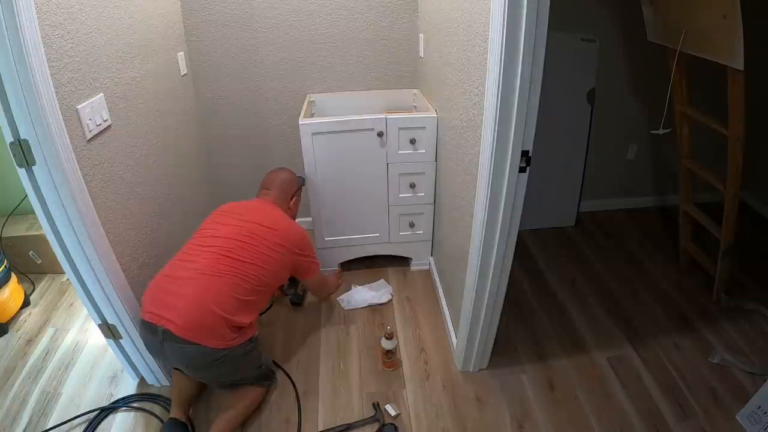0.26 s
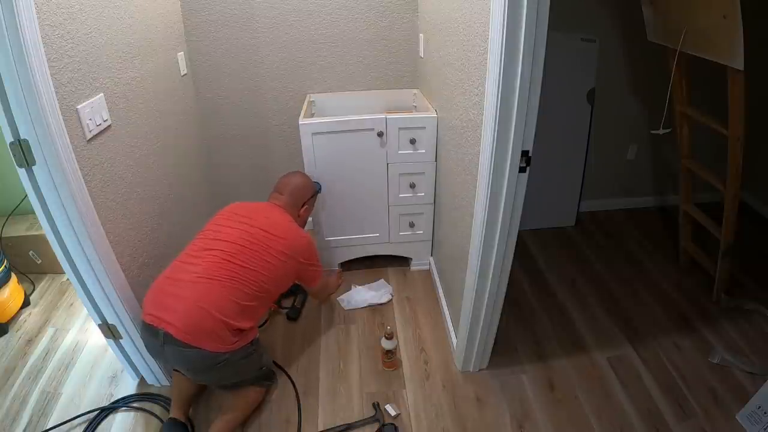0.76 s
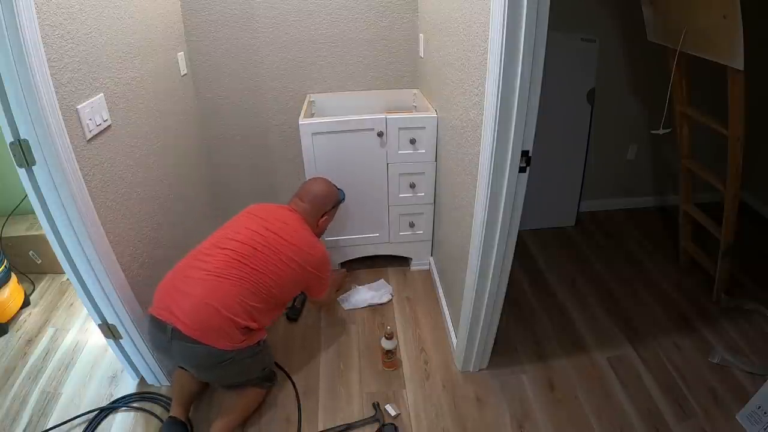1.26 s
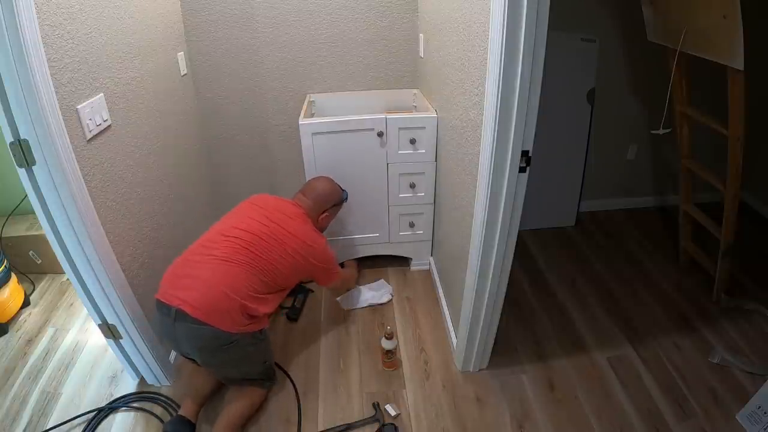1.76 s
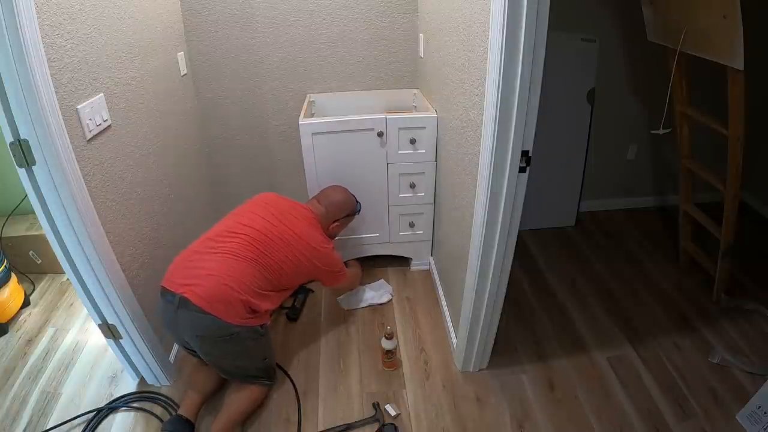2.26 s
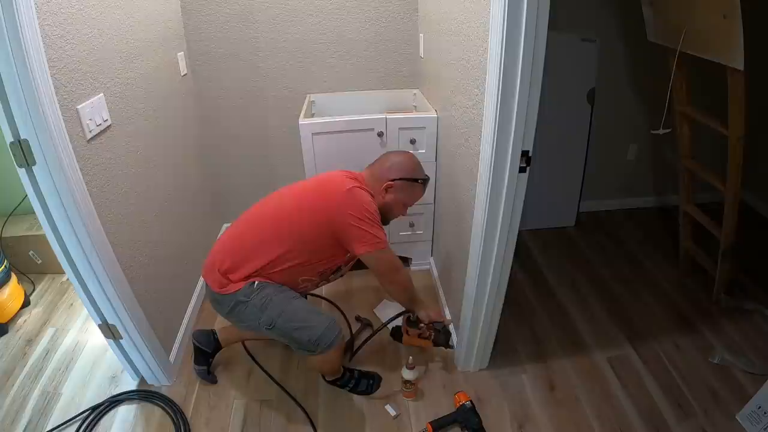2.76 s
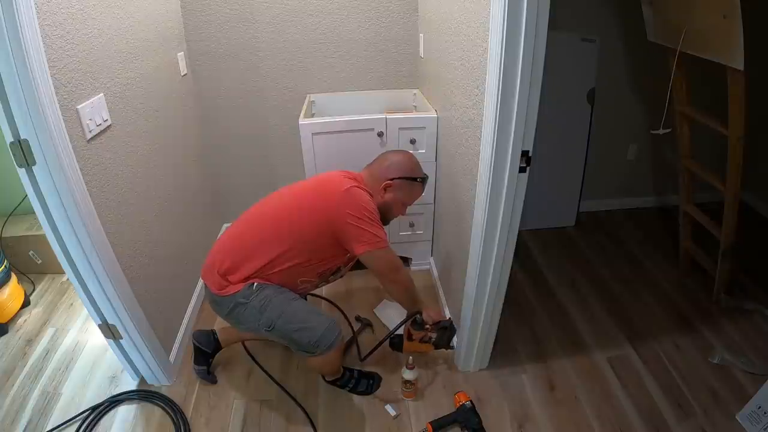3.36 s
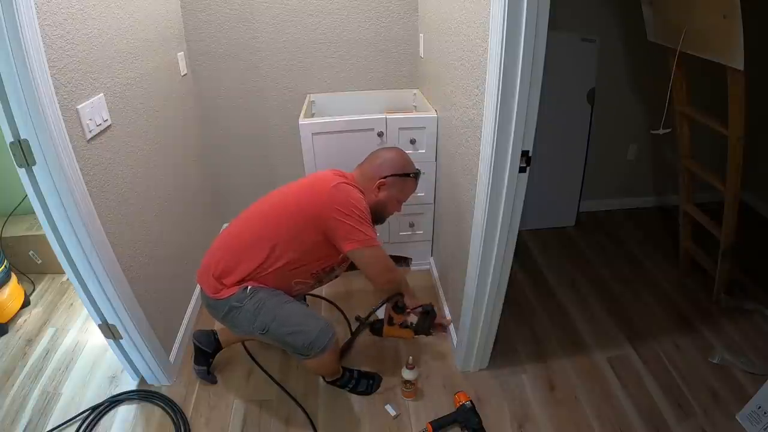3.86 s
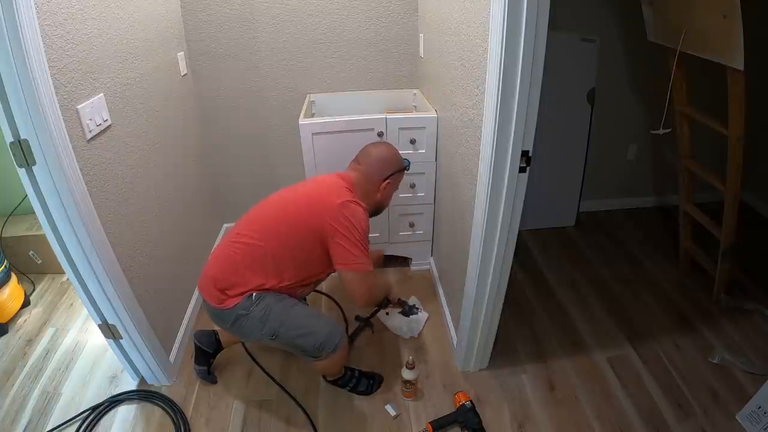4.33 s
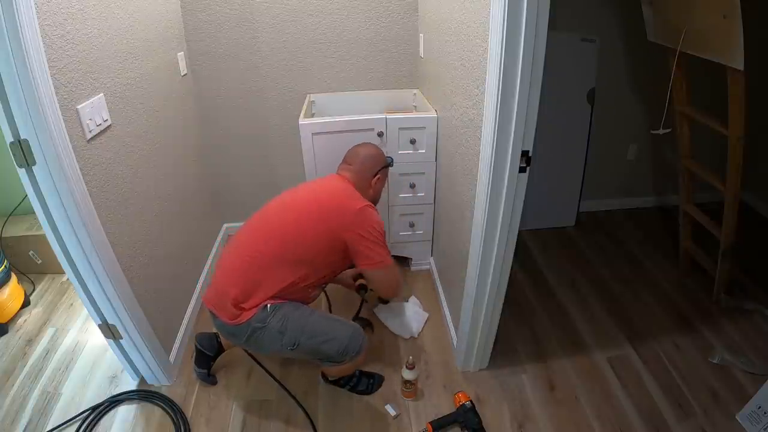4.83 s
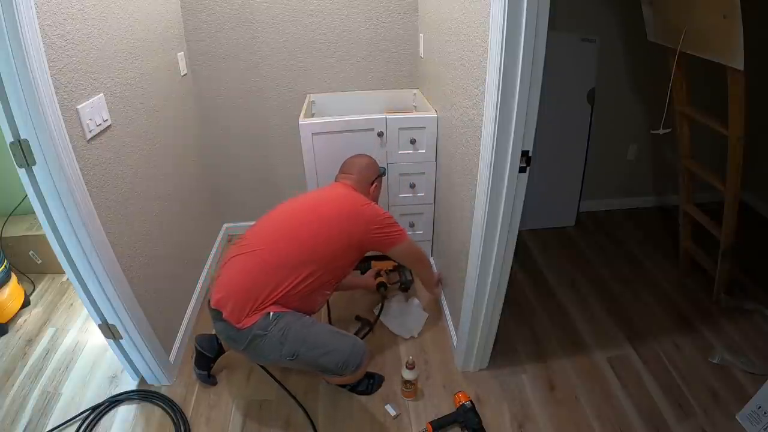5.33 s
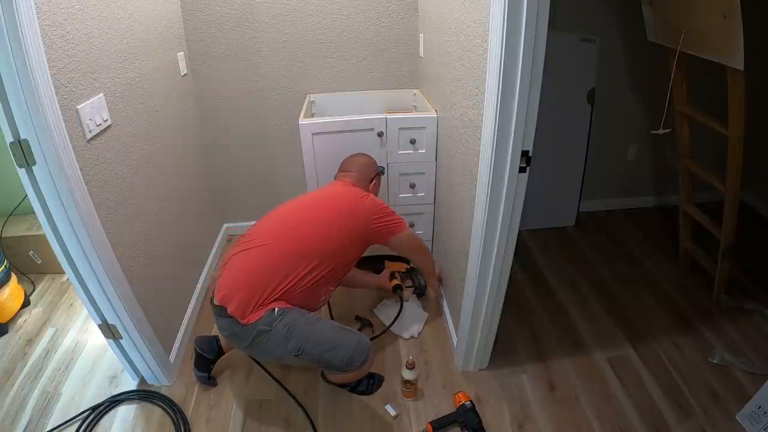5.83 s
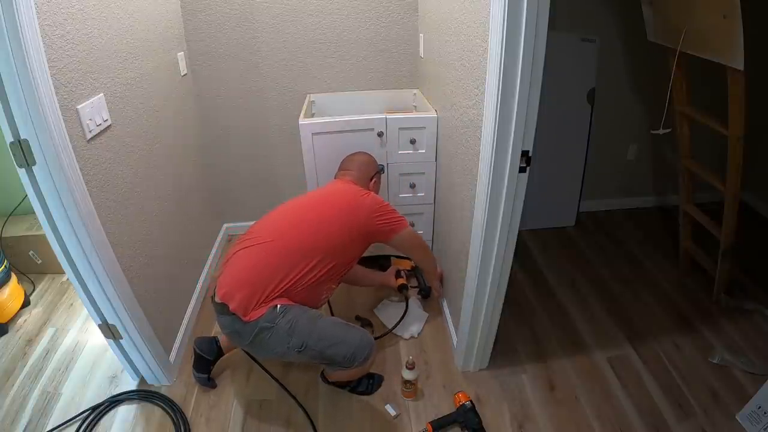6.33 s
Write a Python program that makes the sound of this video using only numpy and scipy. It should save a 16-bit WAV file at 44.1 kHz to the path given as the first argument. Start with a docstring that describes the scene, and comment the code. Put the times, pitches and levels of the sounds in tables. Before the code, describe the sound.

A small, bare, hard-walled room with echoing empty spaces beyond, heard from a few metres away over a very faint hush with a low drone. At 0 s the reverberant tail of a nailer shot is dying away. From 0.36 to 0.47 s sharp wooden clacks come in a quick cluster, more at about 0.6 s, with a fading rattle until 0.7 s. From 0.8 to 2.5 s there is soft scuffing, hose rubbing with thin wavering whistles, small ticks near 1.3 s and low bumps around 1.6-1.7 and 2.25 s. It is nearly still until 3.53 s, when the gun fires: trigger click, piston crack, steel ring, wall boom, then a short air puff about a tenth of a second later. The echo rings on. Shuffling and hose squeaks return from 4 s, strongest near 4.8 s, with a small clack at 4.9 s, soft bumps near 5.25 s, a duller knock at 6.4 s and a last rub to the end.

```python
"""A pneumatic nailer fixes trim at the foot of a cabinet in a small bare room that opens on empty, echoing rooms.
First one shot dies away; then wood clacks and rattles on the floor (struck noise and decaying modes).
Next the kneeling worker shifts about: pitched bumps, light ticks, friction noise, whistles of the hose.
A second shot follows: trigger, piston, nail and ringing-on (noise bursts, steel, wall boom), exhaust puff (noise).
The shifting resumes, with a few more clacks, to the end; a hush with a low drone lies under it all."""
import sys
import numpy as np
from scipy import signal
from scipy.fft import rfft, irfft, next_fast_len
from scipy.io import wavfile
from scipy.ndimage import uniform_filter1d

SR = 44100
rng = np.random.default_rng(int(sys.argv[2]) if len(sys.argv) > 2 else 0)


def to_wav(s):
    """Save 16-bit WAV."""
    ch = np.atleast_2d(s).T  # columns
    pcm = np.round(np.clip(ch, -1, 1) * 32767)  # PCM
    wavfile.write(sys.argv[1], SR, pcm.astype(np.int16))


N = 290619
TIME_S = np.arange(N) / SR
HIT_TIME_S = np.arange(2 ** 14) / SR
LEAD_S = 0.4   # the nailer track starts this early

# shots: fire_s, level_db, extra_boom_db, exposed (share of the gun's ring not muffled by the worker)
SHOTS = [(-0.2, -6.5, 5.5, 0.26), (3.531, 0, -3, 0.94)]
# blows and ringing-on within a shot: after_firing_s, level_db, t60_s, tilt_db_per_octave, thump_db
BLOWS_AND_TAILS = [(-0.043, -31.5, .02, 0.34, -46.5), (-0.028, -48.5, 0.037, 2.5, -50.5),
                   (-0.005, -30, .1, 6, -43.5), (0.0, -16, 0.038, 2, -11.5),
                   (0.0236, -14.5, 0.088, 0, -24.5), (0.0268, -23, 0.11, 0, -14.5),
                   (0.04, -22.5, 0.48, -2, -38), (0.089, -26.5, 0.017, -0.5, -45),
                   (0.113, -29, 0.05, 1, -21), (0.14, -31.5, 0.41, -1, -33.5)]
# colour of gun and trim under the driver: freq_hz, gain_db
GUN_COLOUR = [(59, -48), (100, -2), (156, -3.5), (219, -3), (254, -10.5), (289, -6), (568, -5),
              (1330, -15.5), (1640, -11.5), (2250, -11), (5150, -15), (6500, -14.5), (15800, -27)]
# their resonances, lift before muffling: freq_hz, width_hz, lift_db
GUN_PEAKS = [(326, 65, 4), (493, 38, -2.5), (582, 78, 6), (930, 64, 4), (1350, 100, -3), (1706, 100, 6.5),
             (2200, 95, 6.5), (3560, 96, 8), (4800, 120, 4), (5600, 78, 6), (6400, 150, 7), (9140, 310, 8),
             (10200, 250, 8), (11000, 410, -5.5)]
# steel of the gun, level against the blow or tail, before muffling: freq_hz, level_db, t60_s
STEEL_MODES = [(1704, -20, 0.21), (2203, -18, .17), (3846, -23, .2), (3882, -21, .2), (4678, -21, 0.15),
               (6982, -23, 0.15), (9103, -23, .12)]
# boom of wall and cabinet, level against the thump: freq_hz, level_db, t60_s
BOOM_MODES = [(70.6, -14.5, 0.18), (147, -2.5, 0.16), (181, 1, 0.075), (217, -8, 0.16),
              (294.3, -19.5, 0.27)]
# colour of the exhaust air: freq_hz, gain_db
AIR_COLOUR = [(300, -22.5), (1200, -2), (2800, -10), (4200, -0.5), (7000, -3), (10000, -6.5),
              (12000, -10.5), (16000, -18.5)]
# resonances of the exhaust port, lift before muffling: freq_hz, width_hz, lift_db
PORT_PEAKS = [(1324.5, 350, -6.5), (2300, 20, 11.5), (3930, 190, 10.5), (4800, 110, 3), (5600, 240, -3.5),
              (7200, 55, 2.5), (8300, 58, 3), (10200, 110, 3.5)]
# exhaust puff: opening after firing, swell, hold before the valve closes; level against the shot
PUFF_S, PUFF_ATTACK_S, PUFF_HOLD_S = 0.108, 0.004, 0.055
PUFF_DB, PUFF_SAG_DB_PER_S, PUFF_RELEASE_T60_S = -18.5, 164.5, 0.14
# kick as the piston returns: time after firing, level against shot and boom
RECOIL_S, RECOIL_HZ, RECOIL_DB, RECOIL_T60_S = 0.111, 84.8, -23.5, 0.3

# wooden clacks: start_s, level_db, t60_s, tilt_db_per_octave
CLACKS = [(0.355, -17, 0.07, 2), (0.3625, -17, 0.025, 1), (0.408, -22, 0.043, 1.5), (0.416, -32, 0.026, -2),
          (0.4435, -25, 0.057, -0.5), (0.465, -32.5, 0.052, 0), (0.5986, -32.5, 0.088, -1.5),
          (0.6135, -25, 0.062, -.5), (0.667, -42, 0.31, -1), (0.7169, -42, 0.16, -2.5),
          (0.7797, -40.5, 0.035, -2.5), (1.0744, -51.5, 0.05, -5), (1.2532, -58, 0.094, -12),
          (2.245, -56, 0.036, -3), (4.9133, -47.5, 0.16, 1), (5.952, -51, 0.022, -8.5),
          (6.384, -33, 0.058, -6), (6.42, -52.5, 0.21, -6), (6.572, -57, .1, -7)]
# colour of the trim: freq_hz, gain_db
WOOD_COLOUR = [(60, -24.5), (200, -17), (450, -8), (700, -2.5), (900, -0.5), (1400, -6), (2200, -9.5),
               (4000, -13), (7500, -21), (11000, -32), (16000, -44)]
# resonances of the trim: freq_hz, width_hz, lift_db
WOOD_PEAKS = [(516, 35, 7.5), (807, 50, 7.5), (895, 160, 0), (964, 260, 7), (1300, 170, -6),
              (1633, 54, 6.5), (1880, 110, 6), (1900, 53, -5), (2090, 120, 4), (3000, 140, 1),
              (4120, 72, 1.5)]
# ringing modes of the trim, level against the contact: freq_hz, level_db, t60_s
WOOD_MODES = [(556, -12, 0.086), (830, -5.5, 0.044), (860, -9.5, 0.039), (1050, -16.5, 0.029)]
# rattle of the settling wood: start_s, end_s
RATTLE_SPAN_S = (0.53, .7)
RATTLE_PER_S, RATTLE_DB, RATTLE_FADE_DB_PER_S, RATTLE_SCATTER_DB = 45, -43.5, 28, 3
RATTLE_T60_S, RATTLE_TILT_DB_PER_OCTAVE = 0.056, -2.5
# light ticks of tool and hose: start_s, level_db, tilt_db_per_octave
TICKS = [(1.3004, -49.5, 2), (1.383, -51, 2), (1.891, -69, 6), (2.244, -68, 5), (2.427, -68.5, 8.5),
         (2.853, -72, -3.5), (3.025, -74, -11.5), (3.149, -69.5, -4), (3.218, -69.5, -4),
         (3.3751, -64.5, -7.5), (5.267, -66, 2), (5.424, -70, 5)]
# colour of a tick: freq_hz, gain_db
TICK_COLOUR = [(300, -3.5), (1000, 3.5), (3000, 6.5), (6500, 4), (10000, -3.5), (16000, -18)]
TICK_T60_S = 0.045
# knees and feet on the floor, before thud and panel offsets: start_s, level_db, pitch_hz, t60_s
BUMPS = [(1.62, -39.5, 142.3, 0.41), (1.711, -38, 167, 0.052), (1.952, -55, 145, 0.42),
         (2.06, -53.5, 148, 0.26), (2.14, -54, 145, 0.54), (2.251, -42, 140.4, 0.15),
         (4.095, -56, 181, 0.19), (5.251, -52, 210.6, 0.46), (5.27, -48, 189.6, 0.23),
         (5.954, -49, 177, 0.097), (6.383, -55.5, 164.3, 0.47)]
# colour of floor boards under a soft contact: freq_hz, gain_db
BOARD_COLOUR = [(30, -30), (60, -8), (130, -2), (220, -5), (300, 1), (470, 4.5), (700, -7), (1500, -34),
                (8000, -35.5)]

# shifts of the worker, shoes, hose and cloth at once: start_s, length_s, scuff_db, rub_db, swish_db
MOVES = [(0.784, 0.25, -64, -64, -69.5), (1.095, 0.43, -62, -60.5, -67), (1.495, .36, -63, -52.5, -64.5),
         (1.904, 0.34, -73.5, -64.5, -75.5), (2.169, 0.42, -78.5, -68, -80.5),
         (2.533, 0.32, -82, -73, -86.5), (3.936, 0.67, -63, -58, -67.5), (4.525, 0.5, -57.5, -61.5, -64.5),
         (4.759, 0.26, -54.5, -58, -68), (4.88, 0.36, -63.5, -56.5, -70.5), (5.19, 0.4, -72, -71, -82.5),
         (5.55, .2, -75.5, -77, -83), (5.7, 0.36, -81, -72, -86), (6.001, 0.12, -67, -64, -72),
         (6.43, 0.38, -64.5, -70, -90)]
# colour of the shoes' scuff: freq_hz, gain_db
SCUFF_COLOUR = [(200, -31.5), (550, 2.5), (1000, 0), (1600, -5.5), (2600, -5.5), (6000, -37.5)]
# colour of the hose's rub: freq_hz, gain_db
RUB_COLOUR = [(800, -13), (1700, -14), (2500, -2.5), (4700, 2.5), (7000, -7), (9000, -25), (16000, -40.5)]
# resonances of the rubbing hose: freq_hz, width_hz, lift_db
RUB_PEAKS = [(2282, 152, 6), (2687, 330, 0), (3123, 144, 6), (3670, 154, 2.5), (4270, 200, 0.5),
             (4725, 125, 3.5)]
# colour of the cloth's swish: freq_hz, gain_db
SWISH_COLOUR = [(3000, -60), (6500, -6.5), (8500, -7.5), (11000, -14), (14000, -17.5), (16000, -44.5)]
FRICTION_POWER = 0.88   # exponent of friction amplitude on speed
LINGER_DB, LINGER_T60_S = -6.5, 0.83
# hose pulled over an edge, one list per pull, ribs passing a second: time_s, rib_rate_hz
PULLS = [
    [(1.12, 1230), (1.18, 1500), (1.26, 1735), (1.33, 1530), (1.39, 1590), (1.47, 1460), (1.58, 1700),
     (1.7, 2070), (1.84, 1340)],
    [(4.94, 1800), (5.02, 1690), (5.08, 1720), (5.16, 1670), (5.22, 1360)],
    [(5.35, 1290), (5.42, 1460), (5.49, 1340)],
    [(6.47, 1230), (6.53, 1480), (6.6, 1600)],
]
# whistles on overtones of the rib rate, level at the usual rub: multiple, level_db
WHISTLES = [(5, -85), (6, -78), (7, -82), (8, -82), (9, -91)]
WHISTLE_FOLLOWS, USUAL_RUB_DB = 0.45, -60   # share of the rub's swing in dB about its usual level
WAVER_HZ, GRIP_DB, JITTER_RAD = 20, 4.2, 0.9   # unsteadiness of rib rate, level, phase

# reverberation: freq_hz, near_db, near_t60_s, far_db, far_t60_s
ROOMS = [(60, -10, 0.65, -24.5, 0.38), (208, -14, 0.22, -37, 0.23), (550, -12.5, 0.89, -13.5, 1.2),
         (1010, -14.5, 0.13, -8, 0.65), (2200, -7, 0.25, -16.5, 2.1), (4500, -9, 0.5, -11, 1.8),
         (7860, -7, .33, -12, .95), (15000, -18.5, .27, -22, 0.5)]
# colour of the room tone: freq_hz, gain_db
HUSH_COLOUR = [(25, -18), (42, -15.5), (55, -1.5), (80, 3), (110, -4.5), (165, -1), (240, -7.5), (370, -4),
               (600, -11.5), (1000, -19.5), (1400, -26.5), (4500, -29.5), (8000, -33), (16000, -39.5)]
# low drone in the room tone: freq_hz, width_hz, lift_db
HUSH_PEAKS = [(157, 5.2, 7.5)]
HUSH_DB = -68
STOPBAND_HZ = 16500


def nailer():
    """Trigger, piston and driver strike and ring on, the wall booms; then the air vents and the gun kicks back."""
    out = np.zeros(N + round(LEAD_S * SR))
    boom = sum(ring(*mode) * (-1) ** k for k, mode in enumerate(BOOM_MODES))
    steel = sum(ring(*mode) for mode in STEEL_MODES)
    venting = exhaust_envelope()
    for fire_s, shot_db, boom_db, exposed in SHOTS:
        start_s = fire_s + LEAD_S
        shot_gain = from_db(shot_db)
        gun_peaks = np.array(GUN_PEAKS) * [1, 1, exposed]
        port_peaks = np.array(PORT_PEAKS) * [1, 1, exposed]
        for after_s, level_db, t60_s, tilt_db, thump_db in BLOWS_AND_TAILS:
            burst = strike(GUN_COLOUR, gun_peaks, level_db, t60_s, tilt_db)
            ringing = exposed * from_db(level_db) * steel
            thump = from_db(thump_db + boom_db) * boom
            add(out, start_s + after_s, shot_gain * (burst + ringing + thump))
        air = rms_one(colour(rng.standard_normal(len(HIT_TIME_S)), AIR_COLOUR, port_peaks))
        add(out, start_s, shot_gain * venting * air)
        recoil = ring(RECOIL_HZ, RECOIL_DB + shot_db + boom_db, RECOIL_T60_S)
        add(out, start_s + RECOIL_S, recoil)
    return out


def exhaust_envelope():
    """The valve opens quickly, the pressure sags as the cylinder empties, then the valve closes."""
    t = np.maximum(HIT_TIME_S - PUFF_S, 0)
    opening = np.minimum(t / PUFF_ATTACK_S, 1)
    pressure = from_db(PUFF_DB - PUFF_SAG_DB_PER_S * t)
    closing = dying(np.maximum(t - PUFF_HOLD_S, 0), PUFF_RELEASE_T60_S)
    return opening * pressure * closing


def handling():
    """Contacts excite their bodies: wood clacks, tool and hose tick, knees and feet bump the boards."""
    out = np.zeros(N)
    trim = sum(ring(*mode) * (-1) ** k for k, mode in enumerate(WOOD_MODES))
    for start_s, level_db, t60_s, tilt_db in list(CLACKS) + rattle():
        clack = strike(WOOD_COLOUR, WOOD_PEAKS, level_db, t60_s, tilt_db)
        # a dull contact puts more of its force into the low modes
        modes = from_db(level_db - 0.91 * tilt_db - 2) * trim
        add(out, start_s, clack + modes)
    for start_s, level_db, tilt_db in TICKS:
        add(out, start_s, strike(TICK_COLOUR, (), level_db, TICK_T60_S, tilt_db))
    for start_s, level_db, pitch_hz, t60_s in BUMPS:
        thud = strike(BOARD_COLOUR, (), level_db - 8.5, t60_s, tilt_db=-0.5)
        swell = 1 - np.exp(-HIT_TIME_S / 0.0078)
        panel = ring(pitch_hz, level_db + 2, 0.82 * t60_s) * swell
        add(out, start_s, thud + panel)
    return out


def rattle():
    """Small uneven touches that fade as the wood settles, as further rows of clacks."""
    start_s, end_s = RATTLE_SPAN_S
    chance = rng.standard_normal((40, 2))
    after_s = (np.arange(len(chance)) + 0.3 * chance[:, 0]) / RATTLE_PER_S
    levels_db = RATTLE_DB - RATTLE_FADE_DB_PER_S * after_s + RATTLE_SCATTER_DB * chance[:, 1]
    return [(start_s + s, level_db, RATTLE_T60_S, RATTLE_TILT_DB_PER_OCTAVE)
            for s, level_db in zip(after_s, levels_db) if start_s + s < end_s]


def sliding():
    """Shoes, hose and cloth drag with friction noise, uneven for shoes and hose; the hose whistles as it rubs."""
    scuff, rub, swish = friction()
    scuffing = scuff * noise(SCUFF_COLOUR) * from_db(2.1 * wander(90))
    rubbing = rub * noise(RUB_COLOUR, RUB_PEAKS) * from_db(-3.64 + wander(120))
    swishing = swish * noise(SWISH_COLOUR)
    whistle_gain = (rub / from_db(USUAL_RUB_DB)) ** WHISTLE_FOLLOWS
    return scuffing + rubbing + swishing + whistle_gain * hose_whistles()


def friction():
    """Amplitudes of scuff, rub and swish follow the half-sine speed of each move and linger in the room."""
    power = np.zeros((3, N))
    for start_s, length_s, *levels_db in MOVES:
        speed = np.sin(np.pi * np.clip((TIME_S - start_s) / length_s, 0, 1))
        power += np.outer(from_db(levels_db), speed ** FRICTION_POWER) ** 2
    kept = dying(1 / SR, LINGER_T60_S) ** 2
    lingering = from_db(LINGER_DB) ** 2 * signal.lfilter([1 - kept], [1, -kept], power + 1e-18)
    return np.sqrt(power + lingering)


def hose_whistles():
    """The ribbed hose sings near overtones of its rib rate, higher as it slides faster; each whistle wavers."""
    out = np.zeros(N)
    for pull in PULLS:
        times_s, rates_hz = np.transpose(pull)
        during = (TIME_S > times_s[0]) & (TIME_S < times_s[-1])
        rib_hz = uniform_filter1d(np.interp(TIME_S[during], times_s, rates_hz), size=1500)
        swell = signal.windows.tukey(len(rib_hz), 0.15)
        for multiple, level_db in WHISTLES:
            waver, grip, jitter = [wander(rate)[during] for rate in (40, 22, 600)]
            phase = 2 * np.pi * np.cumsum(multiple * (rib_hz + WAVER_HZ * waver)) / SR
            gain = swell * from_db(level_db + GRIP_DB * grip)
            out[during] += gain * np.sin(phase + JITTER_RAD * jitter)
    return out


def rooms(x):
    """Noise decaying band by band: the small room answers first, the empty rooms swell later and ring on."""
    t = np.arange(int(1.5 * SR)) / SR
    edges_hz = np.geomspace(40, 17000, 16)
    white, response = rng.standard_normal((2, len(t))), 0
    onset = np.clip((t - 0.004) / 0.0067, 0, 1)
    far_onset = onset * (1 - np.exp(-t / 0.013))
    table = np.array(ROOMS)
    for k, (low, high) in enumerate(zip(edges_hz, edges_hz[1:])):
        bandpass = signal.butter(2, [low, high], "band", fs=SR, output="sos")
        band = signal.sosfilt(bandpass, white[k % 2])
        centre_hz = np.sqrt(low * high)
        near_db, near_t60_s, far_db, far_t60_s = [at_hz(table[:, [0, c]], centre_hz) for c in range(1, 5)]
        near = from_db(near_db) * rms_one(onset * dying(t, near_t60_s))
        far = from_db(far_db) * rms_one(far_onset * dying(t, far_t60_s))
        response = response + band * np.hypot(near, far) / np.sqrt(len(t))
    return signal.fftconvolve(x, response)[:len(x)]


def room_tone():
    """Steady coloured noise with a narrow resonance heard as a low drone."""
    return from_db(HUSH_DB) * noise(HUSH_COLOUR, HUSH_PEAKS)


def strike(spectrum, peaks, level_db, t60_s, tilt_db):
    """A contact scatters into a quick broadband flurry off floor and walls, coloured by the struck body."""
    attack = 1 - np.exp(-HIT_TIME_S / 0.0009)
    flurry = rng.standard_normal(len(HIT_TIME_S)) * dying(HIT_TIME_S, t60_s) * attack
    power = uniform_filter1d(abs(rfft(flurry)) ** 2, size=70)
    flat = causal_filter(flurry, -10 * np.log10(power + 1e-12))
    sound = colour(flat, spectrum, peaks, tilt_db)
    # the level is that of the first moments of the decay
    span_s = 0.003 + abs(t60_s) / np.log(1e6)
    return from_db(level_db) * sound / np.sqrt(np.sum(sound ** 2) / (SR * span_s))


def ring(hz, level_db, t60_s):
    """One struck mode: a sine that decays exponentially."""
    return from_db(level_db) * np.sin(2 * np.pi * hz * HIT_TIME_S) * dying(HIT_TIME_S, t60_s)


def noise(spectrum, peaks=()):
    """Steady coloured noise of rms 1."""
    return rms_one(colour(rng.standard_normal(N), spectrum, peaks))


def wander(rate_hz):
    """Random values, rate_hz new ones a second, joined by straight lines; spread somewhat under 1."""
    knots = rng.standard_normal(N // 40)
    return np.interp(TIME_S * rate_hz, np.arange(len(knots)), knots)


def colour(x, spectrum, peaks=(), tilt_db=0):
    """Pass x through a body: a smooth spectrum, resonances, and a tilt per octave that is level below 700 Hz."""
    hz = np.fft.rfftfreq(2 * next_fast_len(len(x) // 2 + 1, True), 1 / SR)
    gain_db = at_hz(spectrum, hz) + tilt_db * np.log2(np.maximum(hz, 700) / 1000)
    for centre_hz, width_hz, lift_db in peaks:
        gain_db = gain_db + lift_db / (1 + (2 * (hz - centre_hz) / width_hz) ** 2)
    return causal_filter(x, gain_db)


def causal_filter(x, gain_db):
    """Minimum-phase filter with one gain per frequency bin: nothing rings early."""
    cepstrum = irfft(np.log(from_db(gain_db)))
    half = len(cepstrum) // 2
    cepstrum[1:half] *= 2
    cepstrum[half + 1:] = 0
    response = np.exp(rfft(cepstrum))
    return irfft(rfft(x, len(cepstrum)) * response)[:len(x)]


def from_db(db):
    """Decibels to gain."""
    return 10 ** (np.asarray(db) / 20)


def rms_one(x):
    """Scale to an rms of 1."""
    return x / np.sqrt(np.mean(x ** 2) + 1e-20)


def at_hz(points, hz):
    """Read (freq_hz, value) rows on a logarithmic frequency axis."""
    freq_hz, value = np.transpose(points)
    return np.interp(np.log(hz + 1e-3), np.log(freq_hz), value)


def dying(t, t60_s):
    """An envelope that loses sixty decibels in t60_s."""
    return np.exp(-np.log(1000) * t / max(t60_s, 1e-3))


def add(out, start_s, sound):
    """Mix a sound in at start_s; what falls outside is dropped."""
    start = int(round(start_s * SR))
    low, high = max(start, 0), min(start + len(sound), len(out))
    if high > low:
        out[low:high] += sound[low - start:high - start]


def scene():
    """Shots and contacts with their reverberation, then friction and room tone; both channels alike."""
    impacts = nailer()   # starts LEAD_S early, so the first shot already fills the rooms
    add(impacts, LEAD_S, handling())
    mono = (impacts + rooms(impacts))[-N:] + sliding() + room_tone()
    return np.array([mono, mono])


def record(dry):
    """The loudest peaks are rounded and the top is cut."""
    ceiling = 0.45
    rounded = ceiling * np.tanh(dry / ceiling)
    lowpass = signal.cheby2(18, 70, STOPBAND_HZ, fs=SR, output="sos")
    return signal.sosfilt(lowpass, rounded)


dry = scene()
out = record(dry)
to_wav(out)
```